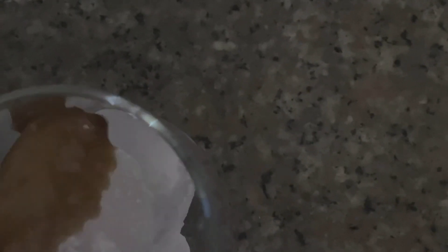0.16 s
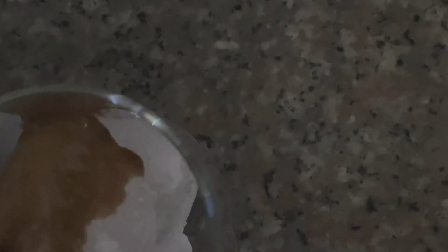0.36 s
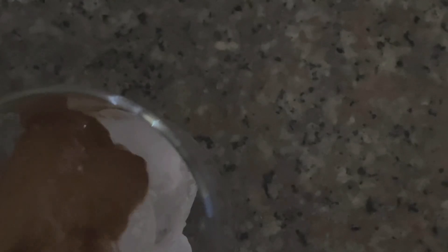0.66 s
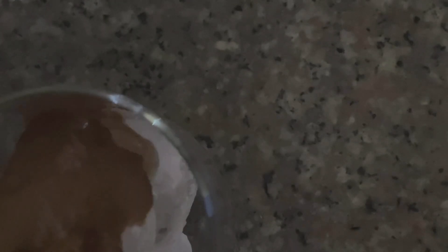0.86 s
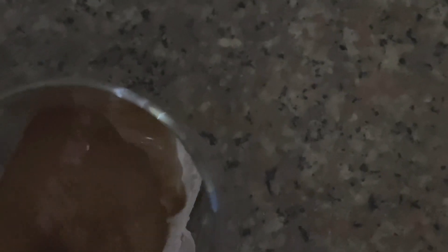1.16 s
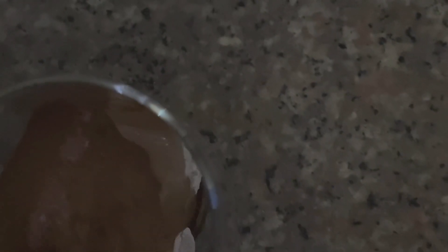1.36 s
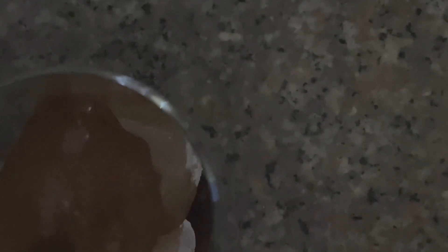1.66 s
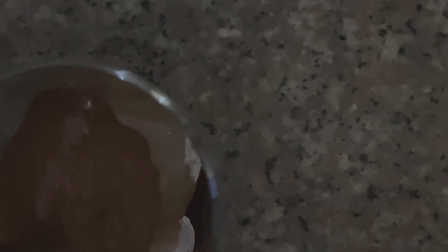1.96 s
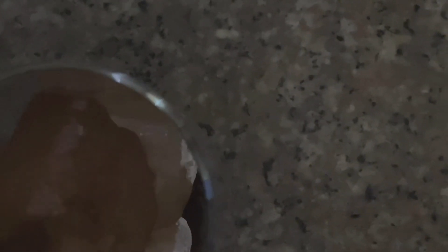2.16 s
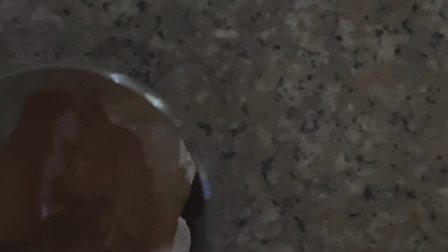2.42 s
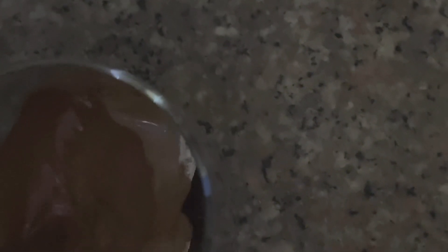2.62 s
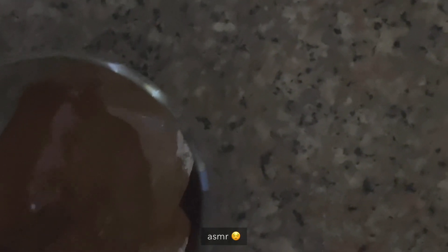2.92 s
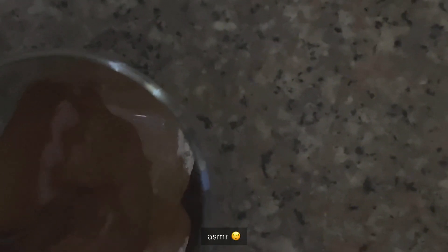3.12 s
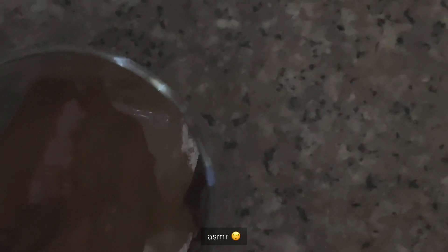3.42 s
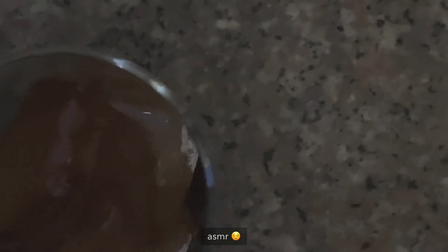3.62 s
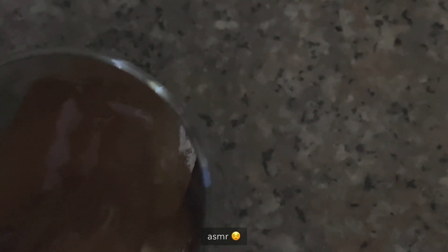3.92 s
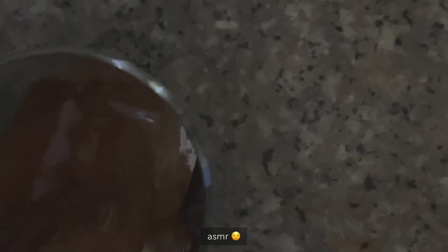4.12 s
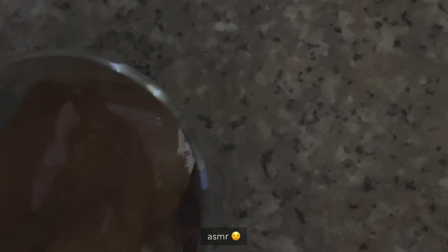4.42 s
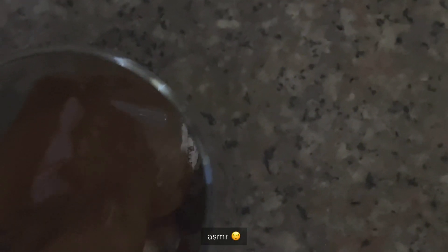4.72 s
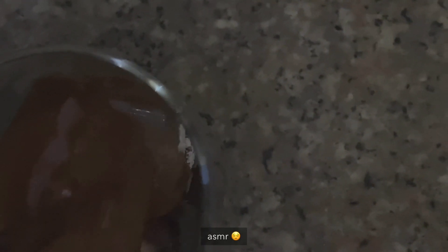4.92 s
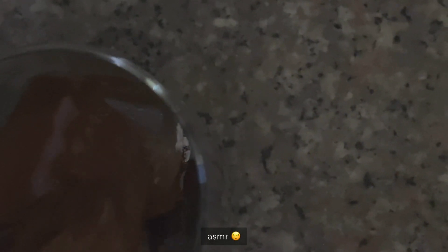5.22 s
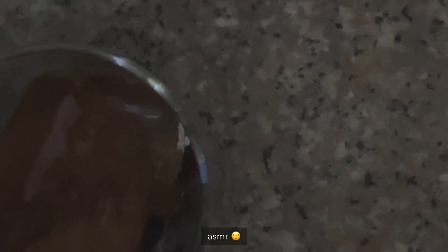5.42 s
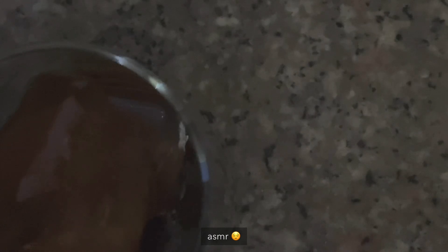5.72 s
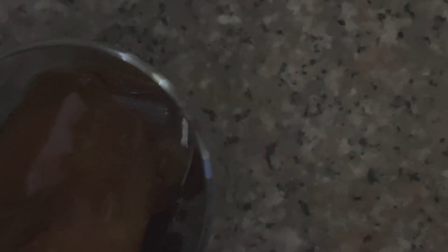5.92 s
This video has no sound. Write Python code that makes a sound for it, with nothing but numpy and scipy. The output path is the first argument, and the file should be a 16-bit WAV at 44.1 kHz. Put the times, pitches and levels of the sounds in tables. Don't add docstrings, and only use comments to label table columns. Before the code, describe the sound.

A close, hand-held phone recording beside a glass of ice and warm drink on a kitchen counter. Throughout there is soft broadband air hiss, a faint wavering low appliance hum, and lumpy low rumble from the gripping hand. From 0 to 1.1 s only muffled finger thuds are heard. At 1.15 to 1.45 s come small crisp ticks, then two hard, dry, glassy snaps at 1.67 and 1.71 s, the first with a low counter knock, followed by barely audible fizz near 1.9 s. Handling bumps fill a lull. Cracking resumes at 2.8 s, with ticks around 3.0 s, bright snaps at 3.12 and 3.24 s, lighter ticks to 3.6 s, the hardest crack at 3.79 s and a last sharp one at 4.37 s. Rings die almost instantly with little room tail. A stronger thud falls at 4.0 s; then hiss, hum, a faint fizz at 5.2 s and handling bumps until 6 s.

```python
import sys
import numpy as np
from scipy import signal
from scipy.fft import rfft, irfft
from scipy.io import wavfile
from scipy.ndimage import uniform_filter1d

SR = 44100
rng = np.random.default_rng(int(sys.argv[2]) if len(sys.argv) > 2 else 0)


def elevation(decibels):
    levels = np.asarray(decibels, float)
    return 10 ** (levels / 20)


def unload_wav(signal):
    wavfile.write(
        sys.argv[1],
        SR,
        np.round(np.clip(np.atleast_2d(signal).T, -1, 1) * 32767).astype(np.int16),
    )


N = 267726
T = np.arange(N) / SR


def read(points, hz, axis=1):
    table = np.transpose(points)
    return np.interp(np.log(hz + 1), np.log(table[0] + 1), table[axis])


def evened(x):
    return x / np.sqrt(np.mean(x ** 2) + 1e-20)


def add(mix, s, sound):
    part = mix[max(round(s * SR), 0):][:len(sound)]
    part += sound[:len(part)]


def coloured(points, size):
    gain = elevation(read(points, np.fft.rfftfreq(size, 1 / SR)))
    return evened(irfft(rfft(rng.standard_normal(size)) * gain, size))


def wander(rate_hz):
    hz, turn = np.geomspace(.2, rate_hz, 20), rng.random(20)
    coarse = np.sin(2 * np.pi * (hz * T[::256, None] + turn)) @ hz ** -.5
    return evened(np.interp(T, T[::256], coarse))


def bell(s, length):
    return np.exp(-((T - s) / length) ** 2)


# start in seconds, strength in dB at 13.5 kHz,
# treble tilt in dB per octave, low thump in dB at 0.8 kHz.
FRACTURES = [(1.144, -27.5, 11, -47), (1.1954, -23, 11.5, -48), (1.2404, -39, 26.5, -66.5),
             (1.3197, -38, 17, -47), (1.4084, -37.5, 8.5, -63.5), (1.418, -42.5, 17, -55),
             (1.4538, -48, 16.5, -46), (1.6733, -19, 5.5, -36), (1.7105, -17, 7, -55.5),
             (2.806, -20.5, 5, -64), (2.9722, -23.5, 17.5, -68.5), (3.042, -40, 21, -64),
             (3.0741, -46, 10.5, -69), (3.119, -18.5, 9, -55), (3.236, -18.5, 3.5, -62),
             (3.5096, -30.5, 11, -60.5), (3.5918, -37, 12, -62.5), (3.7917, -10, 8.5, -59.5),
             (4.1834, -54, 12, -70), (4.366, -15.5, 5, -58)]
SLIPS = [(1.6766, -16, 7, -50), (2.8088, -24, 8, -55)]


def ice():
    out, lag_s = np.zeros(N), .0007
    starts = np.array([row[0] for row in FRACTURES])
    for s, *colour in FRACTURES + SLIPS:
        hard = any(abs(s - freed) < .001 for freed, _ in PIECES)
        front_db = -5 if hard else 0
        add(out, s + lag_s, snap(band_levels(*colour), front_db))
    for s, *mode in modes():
        nearest = starts[abs(starts - s).argmin()]
        add(out, nearest + lag_s, ring(*mode))
    return out


SNAP_HZ = [800, 2400, 4800, 8500, 13500]


def band_levels(strength_db, tilt_db, thump_db):
    octaves = np.log2(np.array(SNAP_HZ[1:]) / SNAP_HZ[-1])
    return np.r_[thump_db, strength_db + tilt_db * octaves]


def snap(levels_db, front_db):
    size = 13000
    t, hz = np.arange(size) / SR, np.fft.rfftfreq(size, 1 / SR)
    low, *rest = levels_db - 10 * np.log10(np.array(SNAP_HZ) / 2400)
    colour = [(250, low - 14), (800, low - 5), (1600, low - 5), (2050, rest[0]),
              *zip(SNAP_HZ[1:], rest), (15000, rest[3]), (16000, rest[3] - 3.0)]
    bright = rfft(rng.standard_normal(size)) * elevation(read(colour, hz))
    dull = bright * elevation(-5.0 * (hz / 10000) ** 2)
    front = (1 - np.exp(-t / .0001)) * elevation(-60 * t / .008)
    echo = elevation(-30.5) * np.interp(t - .0023, t, front, left=0)
    decay = elevation(-15.5 - 60 * t / 0.048) + elevation(-26 - 60 * t / 0.082) + elevation(-36.5 - 60 * t / 0.79)
    clatter = (1 - np.exp(-t / 0.000292)) * decay
    hit = irfft(bright, size) * elevation(front_db) * (front + echo)
    return 4.36 * (hit + irfft(dull, size) * clatter)


# frequency in Hz, starting level in dB.
BREAK_A = [(2280, -19.5), (3000, -40), (3470, -34.5), (3890, -28), (4360, -27), (4640, -30), (4970, -24),
           (5290, -27), (5600, -27), (5890, -31), (6580, -31), (7050, -26.5),
           (8020, -20), (8670, -32), (9110, -32), (10110, -26), (10660, -17), (11260, -15.5),
           (11630, -18.0), (12330, -33), (12890, -33), (13530, -12), (13940, -16.0), (14270, -18),
           (14900, -20), (15540, -17.0)]
BREAK_B = [(2270, -21), (2900, -25), (3180, -23), (3410, -24), (3960, -20.5), (4920, -40), (5570, -25),
           (5910, -30), (6270, -29.0), (6930, -22),
           (8210, -15), (9020, -23), (9400, -25), (9840, -18), (10150, -21), (10660, -14), (11090, -16),
           (11710, -17), (12330, -13), (12770, -8), (13450, -20.5), (14040, -21), (14480, -11),
           (15080, -12)]
BREAK_C = [(2450, -23.5), (3460, -26), (4120, -27), (4750, -26), (5470, -43), (5920, -26), (6630, -24.5),
           (7340, -17), (7750, -22),
           (8090, -24), (9670, -25.5), (10450, -17.5), (11910, -25.5), (12550, -19), (12900, -21.5),
           (13370, -13), (13760, -27), (14020, -26), (14470, -14.5), (14880, -20), (15500, -7),
           (15750, -17), (16290, -24)]
BREAK_D = [(2500, -25.5), (3390, -38), (4050, -31), (4450, -40.0), (4970, -37.5), (5370, -34), (6600, -23),
           (7000, -24), (7800, -23),
           (8660, -24.5), (9290, -32.0), (9870, -34.5), (10220, -28.0), (10540, -28.5), (11080, -28.5),
           (11520, -33.5), (11930, -31), (12390, -18), (12720, -22.5), (13220, -16.5), (13840, -11),
           (14440, -22), (15550, -12)]
BREAK_E = [(2000, -35.0), (2710, -20), (3090, -25), (3420, -29), (3950, -22.5), (4910, -21.5), (6040, -43),
           (6860, -31), (7700, -14),
           (8770, -36.0), (9190, -37), (9610, -31), (10210, -20), (11210, -19), (11810, -22), (12320, -36),
           (12590, -28.0), (13190, -27.5), (13740, -19.5), (14510, -19.5), (15280, -23.5), (15700, -19)]
BREAK_F = [(2500, -22.5), (3490, -30), (4170, -43), (4890, -20), (5370, -21), (5950, -25.5), (6640, -19),
           (6970, -31), (7350, -13),
           (8890, -20), (9230, -17), (9730, -12), (10170, -13.0), (10530, -16), (10990, -23),
           (11550, -23.5), (11850, -20), (12230, -23), (13200, -14), (13710, -16), (14200, -9)]
BREAK_G = [(2450, -27.5), (3340, -24.5), (3980, -14.5), (4370, -20.5), (4730, -29), (5360, -18), (5980, -24),
           (6430, -25), (6940, -41), (7270, -19), (7860, -22),
           (8320, -28), (8980, -15), (10410, -17), (10950, -29.0), (11560, -21), (12190, -27),
           (12640, -20.5), (13050, -21), (13880, -25.5), (14310, -26), (14630, -27), (15090, -17),
           (15500, -27)]
# start in seconds, modes of wall and piece.
PIECES = [
    (1.6731, BREAK_A),
    (1.7106, BREAK_B),
    (2.806, BREAK_C),
    (3.119, BREAK_D),
    (3.236, BREAK_E),
    (3.7917, BREAK_F),
    (4.3663, BREAK_G),
]
# frequency in Hz, level in dB against the tick's strength.
SLIVER = [(12400, -3), (13750, -6), (14600, -8.5), (15480, -6)]
# start in seconds, frequency in Hz, starting level in dB,
# time to fall 60 dB in seconds.
GLASS = [(1.1438, 7320, -26, 0.0137), (1.1951, 5490, -41, 0.0153), (1.1951, 14900, -36, .04),
         (1.3194, 12300, -43, .015), (1.6731, 605, -38, 0.12), (1.6731, 1153, -38, 0.11),
         (1.6731, 2180, -33, 0.06), (1.6731, 5200, -27, 0.06), (1.7106, 592, -35.5, 0.097),
         (1.7106, 1960, -32.5, .06), (1.7106, 2820, -31.5, 0.098), (1.7106, 6660, -32, .06),
         (2.806, 668, -38, 0.08), (2.806, 1750, -28.5, 0.044), (2.806, 14650, -32, 0.08),
         (2.9723, 10600, -27, 0.015), (3.119, 684.6, -42, 0.09), (3.119, 15640, -36, .07),
         (3.236, 740, -46, 0.14), (3.236, 1210, -42.5, 0.098), (3.236, 1930, -40, 0.1),
         (3.236, 7400, -32, 0.07), (3.7917, 778, -46, 0.15), (3.7917, 1910, -31.5, 0.1),
         (3.7917, 3510, -31, 0.061), (3.7917, 6540, -29, 0.05), (3.7917, 10450, -25, 0.097),
         (4.3663, 1300, -32.5, 0.079), (4.3663, 3970, -36, .04), (4.3663, 5950, -26.5, 0.07),
         (4.3663, 6440, -27, 0.067)]


def modes():
    rows = [(s, hz, db) for s, piece in PIECES for hz, db in piece]
    for s, strength_db, *_ in FRACTURES:
        if min(abs(s - freed) for freed, _ in PIECES) > .01:
            for hz, rel_db in SLIVER:
                size_factor = 1 + 0.018 * rng.standard_normal()
                rows.append((s, hz * size_factor, strength_db + rel_db))
    return [(s, hz, db, 0.014 * (hz / 10000) ** -0.41) for s, hz, db in rows] + GLASS


def ring(hz, db, t60):
    chance = rng.standard_normal(10000)
    t = np.arange(len(chance)) / SR
    width = .07 * min(1, .03 / t60)
    r = np.exp(-np.pi * width * hz / SR)
    resonator = [1, -2 * r * np.cos(2 * np.pi * hz / SR), r * r]
    blur = evened(signal.lfilter([1, 0, -1], resonator, chance))
    pure = np.sin(2 * np.pi * hz * (t - 0.0001123 * chance[0]))
    clean = np.exp(-t / .006)
    tone = elevation(-60 * t / t60) * (clean * pure + 0.42 * np.sqrt(1 - clean ** 2) * blur)
    trail = (elevation(-35 - 60 * t / (9.5 * t60)) + elevation(-50 - 60 * t / 0.8)) * blur
    rise = (1 - np.exp(-t / .00018)) ** 2
    return elevation(db + 1.5) * rise * (tone + trail)


# start in seconds, peak in dB, first and last frequency in Hz.
KNOCKS = [
    (1.676, -27, 606, 85.4),
    (2.807, -33.5, 570, 108.6),
    (3.793, -38.5, 480, 117),
]


def knocks():
    out, t = np.zeros(N), np.arange(1500) / SR
    for s, db, first_hz, last_hz in KNOCKS:
        hz = last_hz + (first_hz - last_hz) * np.exp(-t / 0.00485)
        envelope = (t / 0.01) * np.exp(1 - t / 0.0044)
        add(out, s, elevation(db) * envelope * np.sin(2 * np.pi * np.cumsum(hz) / SR))
    return out


# middle in seconds, length in seconds, level in dB.
FIZZ = [
    (1.89, .05, -60),
    (5.18, .06, -55),
]
# frequency in Hz, level in dB.
FIZZ_COLOUR = [(1500, -28), (2200, -3), (3300, -6), (4200, -30)]


def fizz():
    grains = .5 + rng.exponential(1, N // 128 + 1).repeat(128)[:N]
    bubbles = evened(grains * coloured(FIZZ_COLOUR, N))
    return bubbles * sum(elevation(db) * bell(s, length) for s, length, db in FIZZ)


# middle in seconds, peak in dB, frequency in Hz, length in seconds.
THUDS = [(.19, -34, 53.5, 0.017), (.424, -34, 69.4, 0.023), (.469, -32.5, 65, 0.0062),
         (3.278, -34, 64.6, 0.017), (.538, -30.5, 59, 0.023), (.723, -29.5, 64, 0.023),
         (.761, -26.5, 60, 0.028), (1.106, -34, 50, 0.015), (1.255, -35, 68, 0.016),
         (1.283, -36, 72, 0.0069), (1.311, -29, 51.8, 0.013), (1.383, -30, 54.8, 0.023),
         (1.876, -30, 55.7, 0.015), (1.903, -34, 55.4, 0.0153), (1.978, -28, 57.4, 0.05),
         (2.047, -29, 63, 0.0257), (2.16, -31.5, 60.6, 0.023), (2.454, -35, 51.2, 0.012),
         (2.574, -31, 55.2, 0.017), (3.44, -34.5, 55.4, 0.029), (3.589, -28, 52, 0.023),
         (3.03, -42, 69.65, 0.031), (3.17, -38.5, 69, 0.035), (4.024, -23.5, 58, 0.02),
         (3.31, -40, 61, 0.033), (4.179, -34.5, 53.7, 0.021), (4.359, -34.5, 58.7, 0.03),
         (5.275, -27.5, 60, 0.0185), (5.38, -35, 52, 0.051), (5.736, -32, 70, 0.0062),
         (.504, -26, 91.2, 0.0099), (0.751, -38, 140.7, 0.0087), (1.269, -43.5, 129, 0.0091),
        (1.955, -36.5, 133.7, 0.01), (3.973, -35.5, 89.4, 0.027), (3.995, -31.5, 123.2, 0.0104),
        (4.063, -32, 99, 0.0214), (5.29, -41, 131, 0.012),
         (0.06, -35, 54, 0.03), (0.109, -35, 55, 0.013), (0.165, -39, 50, 0.015), (0.229, -34, 52, 0.013),
          (0.252, -37, 48, 0.01), (0.294, -36, 49, 0.014), (0.319, -35, 51, 0.012), (0.361, -36, 52, 0.013),
          (0.573, -40, 60, 0.01), (0.597, -35.5, 67, 0.02), (0.632, -36, 64, 0.014),
          (0.681, -36, 60, 0.016), (0.825, -40, 49, 0.019), (0.866, -37.5, 63, 0.015),
          (0.913, -41, 59, 0.011), (0.935, -39, 51, 0.014), (0.964, -43, 51, 0.012),
          (1.002, -40, 53.4, 0.01), (1.059, -38.5, 45, 0.021), (1.169, -36.5, 49, 0.016),
          (1.225, -36, 49, 0.028), (1.504, -37, 56, 0.02), (1.582, -40, 48.2, 0.029),
          (1.688, -40, 85, 0.02), (1.94, -38, 69, 0.007), (2.004, -30.5, 55, 0.0076),
          (2.086, -35.5, 49, 0.02), (2.129, -31, 59, 0.0097), (2.225, -38, 60, 0.017),
          (2.283, -41, 61, 0.013), (2.374, -36.5, 61, 0.012), (2.418, -38, 62, 0.011),
          (2.481, -40, 61, 0.012), (2.527, -38, 81, 0.01), (2.655, -42, 51, 0.023),
          (3.199, -36.5, 65, 0.017), (3.531, -38, 59, 0.021), (3.775, -39, 69, 0.011),
          (3.804, -42, 60, 0.02), (4.111, -36, 69, 0.038), (5.339, -35, 67, 0.012), (5.597, -38, 66, 0.027),
          (5.704, -36, 62, 0.011), (5.805, -40, 53, 0.011), (5.866, -40, 65, 0.021)]
OPPOSED_TOUCHES = [(2.045, -45, 130, .02), (2.127, -43, 130, .022), (2.118, -50, 450, .004),
                   (4.016, -48, 110, .02), (4.9, -50, 300, .012), (4.916, -47, 150, .02), (5.076, -48, 180, .015)]


def thuds(rows):
    out, t = np.zeros(N), np.arange(-.08, .08, 1 / SR)
    for s, db, hz, length in rows:
        cycles = hz * t * (1 - 8.9 * t) + rng.random()
        pulse = np.exp(-2.4 * (t / length) ** 2) * np.cos(2 * np.pi * cycles)
        add(out, s - .08, elevation(db + 1.5) * pulse)
    return out


# time in seconds, level in dB.
GRIP = [(0.0, -42.5), (0.12, -47.5), (0.37, -44), (0.96, -50), (1.25, -46.5), (1.71, -50.5), (1.89, -45),
        (2.03, -46), (2.52, -49), (2.64, -45), (2.77, -59.5), (3.01, -56.5), (3.25, -47), (4.13, -47.5),
        (4.94, -53.5), (5.09, -55.5), (5.82, -47.5), (6.07, -48.5)]
# frequency in Hz, level in dB.
GRIP_COLOUR = [(15, -28), (30, 2.5), (50, 5), (78, 2.5), (120, -14.5), (180, -26.5), (300, -56.5)]


def grip():
    s, db = np.transpose(GRIP)
    return elevation(np.interp(T, s, db) + 2.7 * wander(3.6)) * coloured(GRIP_COLOUR, N)


# frequency in Hz, level in dB.
HUM = [(120, -59.5), (180, -70.5), (240, -72), (478, -74)]
# middle in seconds, length in seconds, frequency in Hz,
# level in dB.
SWELLS = [(0.051, 0.194, 361, -62.5), (0.4, 0.42, 301, -66), (0.647, 0.149, 361, -59.5),
          (1.493, 0.54, 361, -65.5), (2.2, 0.54, 301, -66.5), (2.8, 0.71, 361, -63.5),
          (3.2, 0.62, 301, -67), (4.05, 0.28, 361, -69), (4.398, 0.74, 301, -64), (5.092, 1, 361, -67),
          (5.3, 0.6, 301, -62.5), (5.96, 0.12, 361, -63)]


def hum():
    tones = [(hz, elevation(db + 2.2 * wander(5.8))) for hz, db in HUM]
    for pitch_hz in (301, 361):
        swells = sum(elevation(db) * bell(s, length) for s, length, hz, db in SWELLS if abs(hz - pitch_hz) < 30)
        tones.append((pitch_hz, swells * elevation(-1.0 + 3.6 * wander(12.))))
    out = np.zeros(N)
    for hz, gain in tones:
        cycles = np.cumsum(hz * (1 + 0.00699 * wander(6.))) / SR
        out += gain * elevation(3.0) * np.sin(2 * np.pi * cycles)
    return out


# frequency in Hz, level in dB.
AIR = [(40, 6.5), (120, 5), (170, 0.5), (260, -4.5), (400, -4), (650, -8), (1100, -5.5), (1600, -8),
       (2200, -8), (3000, -11.5), (5000, -16), (8000, -21.5), (12000, -27), (16000, -29.5)]


def air():
    swell = elevation(-48.5 + 0.045 * wander(5.1) + gain_control_db())
    return swell * coloured(AIR, N), swell * coloured(AIR, N)


# start in seconds, dip in dB.
DIPS = [(1.68, 0), (1.715, 6.5), (2.81, 6.5), (3.12, 1.5), (3.24, 2.5), (3.795, 6), (4.37, 2)]


def gain_control_db():
    out = np.zeros(N)
    for s, db in DIPS:
        u = np.maximum(T - s, 0) / 0.044
        out -= db * u * np.exp(1 - u)
    return out


# frequency in Hz, phase lead of the left in radians, likeness from 0 to 1,
# left minus right in dB.
PORTS = [(60, 0.5, 1, 3), (138, 0.65, 0.95, -2.5), (239, -0.8, 0.79, -1), (425, 0.4, 0.2, -2.5),
         (605, 0.5, 0, -1.5), (820, -2.5, 0.58, -3), (1422, -2, 0.64, 0.9), (1654, 1.9, 0.44, 4.5),
         (1816, 0, 0.94, 3.5), (2417, 0.5, 0.92, -0.3), (3360, 0, 1, -2.5), (4520, 1.02, 0.93, 0.5),
         (4861, 0.0165, 0.81, 0)]


def ports(near, air, other_air):
    hz = np.fft.rfftfreq(N, 1 / SR)
    lag_s = 0.00017
    lead = read(PORTS, hz) + 2 * np.pi * lag_s * np.maximum(hz - PORTS[-1][0], 0)
    lead = lead + .5 * np.clip((hz - 5000) / 1500, 0, 1)
    same = np.clip(read(PORTS, hz, axis=2), 0, 1)
    tilt = elevation(read(PORTS, hz, axis=3) / 2)
    near_lead = lead * np.clip(hz / 1800, 0, 1) ** 2
    near, air = rfft(near), rfft(air)
    left = near * np.exp(.5j * near_lead) + air * tilt * np.exp(.5j * lead)
    right_air = same * air * np.exp(-.5j * lead) + np.sqrt(1 - same ** 2) * rfft(other_air)
    right = near * np.exp(-.5j * near_lead) + right_air / tilt
    return np.array([irfft(left, N), irfft(right, N)])


def scene():
    near = ice() + knocks() + fizz() + thuds(THUDS) + grip()
    near = near + hum() * elevation(gain_control_db())
    return ports(near, *air()) + thuds(OPPOSED_TOUCHES) * [[1], [-1]]


# frequency in Hz, dB against the quiet level.
WEAK = [(2000, -22.5), (2600, -13.5), (4500, -6.5), (7500, -7.5), (10500, -7.5), (13500, -5.5), (16000, -3)]
EDGE_HZ = 15600


def masked(dry):
    attack = np.zeros(N)
    for s, *_ in FRACTURES + SLIPS:
        add(attack, s - .002, signal.windows.tukey(round(.013 * SR), .5))
    whole = dry * np.minimum(attack, 1)
    rest = dry - whole
    hz, _, z = signal.stft([rest[0] + rest[1], rest[0] - rest[1]], SR, nperseg=2048)
    power = uniform_filter1d(abs(z) ** 2, size=16, axis=1)
    both, weak_db = power.sum(0), 2 * read(WEAK, hz)[:, None]
    floor = np.median(both, axis=1)[:, None] * elevation(weak_db)
    floor = np.maximum(floor, both * elevation(weak_db - 1.5))
    floor[hz > EDGE_HZ] = 1
    total, difference = signal.istft(z * (power > floor), SR, nperseg=2048)[1][:, :N]
    return whole + np.array([total + difference, total - difference]) / 2


def band_limit(x):
    return signal.sosfilt(signal.butter(12, 17150, fs=SR, output="sos"), x)


def record(dry):
    rolloff = signal.firwin(101, EDGE_HZ + 500, window=("kaiser", 5), fs=SR)
    mix = masked(signal.oaconvolve(dry, rolloff[None], "same"))
    return band_limit(mix)


dry = scene()
out = record(dry)
unload_wav(out)
```